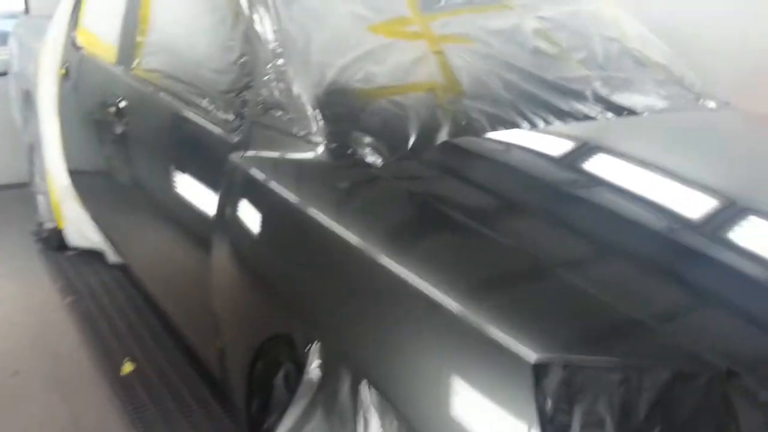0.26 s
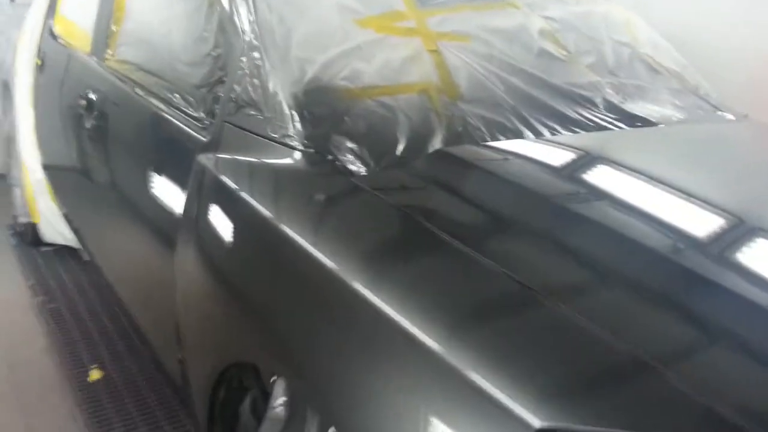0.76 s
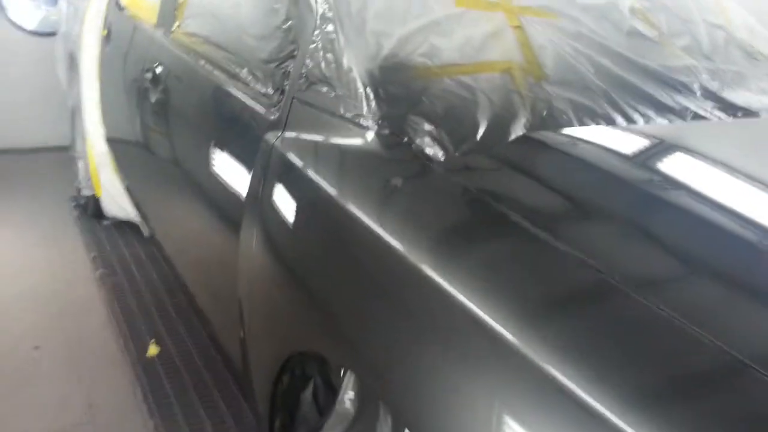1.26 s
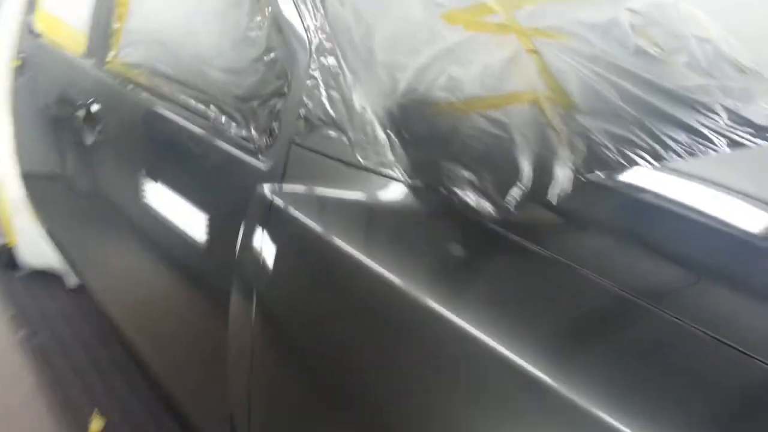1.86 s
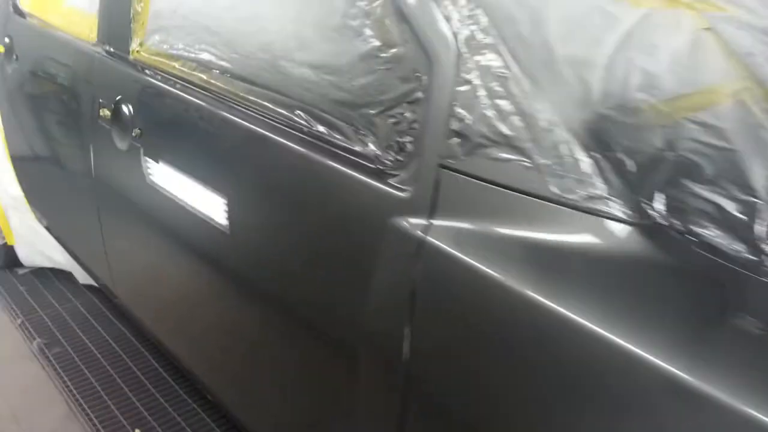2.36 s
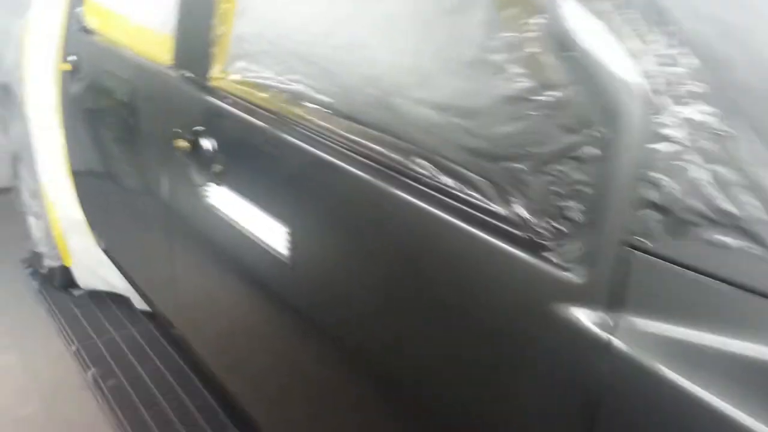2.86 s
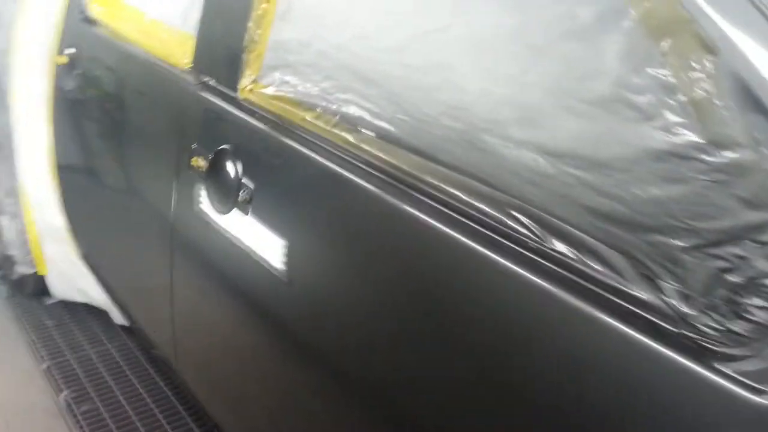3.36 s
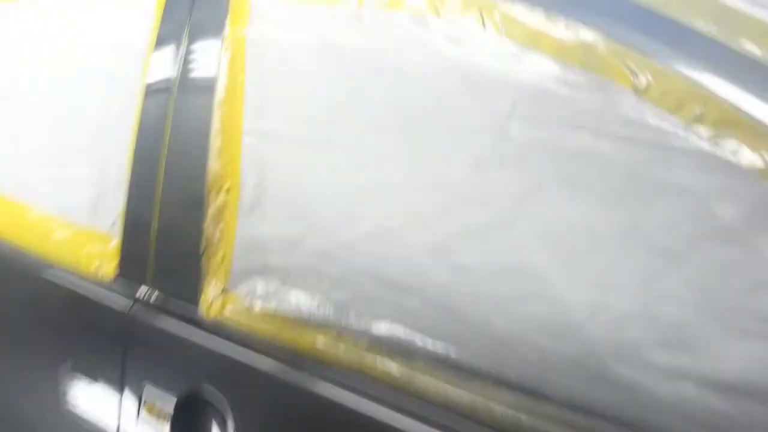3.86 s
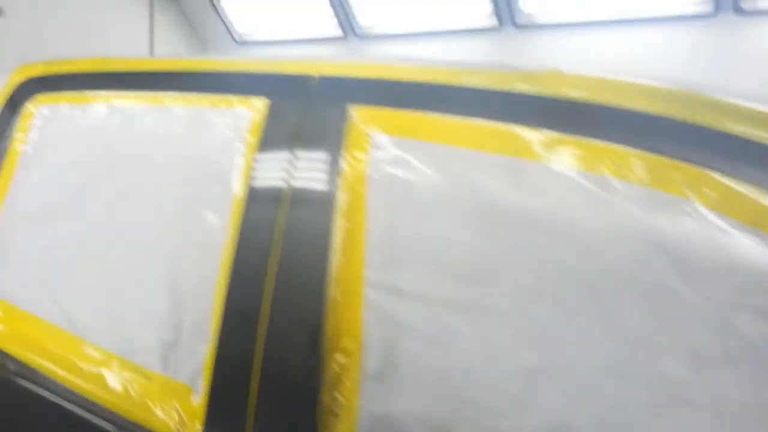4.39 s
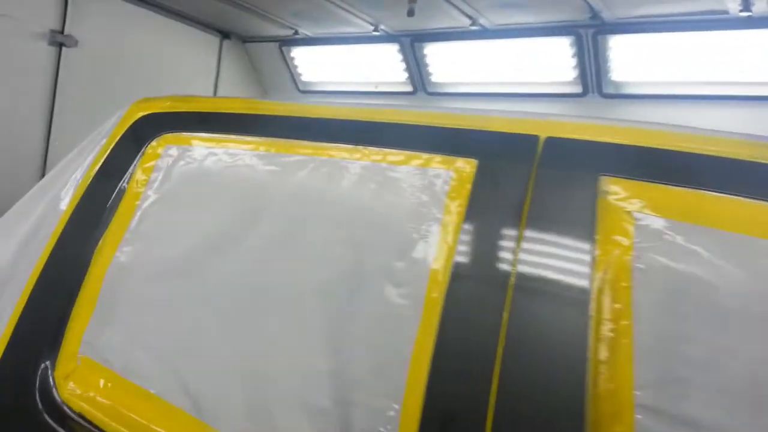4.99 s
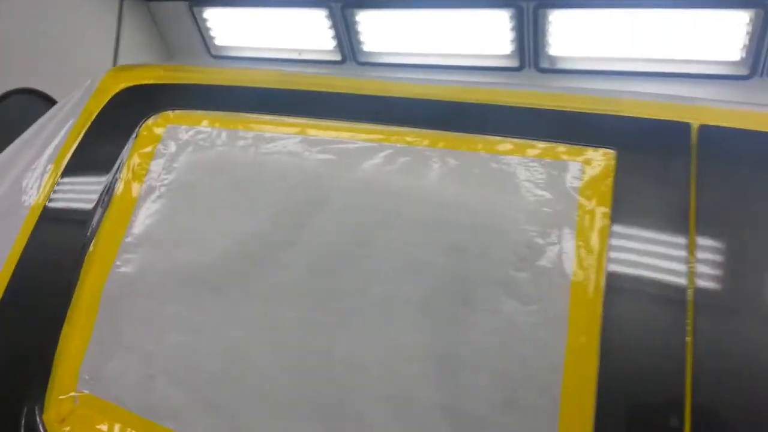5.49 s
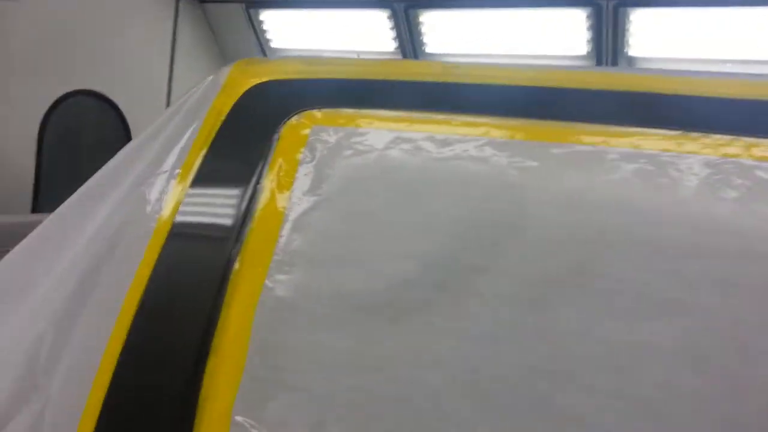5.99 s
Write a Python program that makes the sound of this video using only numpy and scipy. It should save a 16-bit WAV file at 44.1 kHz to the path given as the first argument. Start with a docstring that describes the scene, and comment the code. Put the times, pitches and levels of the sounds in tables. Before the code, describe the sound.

Loud, steady rush of ventilation air fills a hard-walled booth with a wavering low drone; one sharp double tick hits the microphone early on.

```python
"""Ventilation fans run in a large spray booth while a hand-held camera with two microphones moves along a car.
Turbulent air fills the hard-walled booth with a diffuse rush; the ducts drone and the fans hum faintly throughout.
Early on, a sharp double tick on the camera body makes its limiter duck for a moment.
The camera then rises from the car's wing to its roof and the rush grows; a very faint, thin click follows late."""
import sys
import numpy as np
from scipy import signal
from scipy.fft import rfft, irfft
from scipy.io import wavfile
from scipy.ndimage import uniform_filter1d, minimum_filter1d

SR = 44100
rng = np.random.default_rng(int(sys.argv[2]) if len(sys.argv) > 2 else 0)


def transcribe(u):
    """Save the signal u as a 16-bit wav file named by the first command-line argument.

    u: samples, shape (n,) or (channels, n), limited to [-1, 1]; the rate is SR.
    q: integer samples, one column per channel.
    """
    v = np.clip(np.atleast_2d(u).T, -1, 1)
    q = np.round(v * 32767).astype(np.int16)
    wavfile.write(sys.argv[1], SR, q)


N = 275184
TIME = np.arange(N) / SR
FREQ = np.fft.rfftfreq(N, 1 / SR)


def rush(level_db=-16, deep_hz=55, rumble_hz=125, airy_hz=480, hiss_hz=2800, rumble_db=-4.5, airy_db=-1.33):
    """Broad turbulent-air noise, coloured by the microphone ports; rumble and top grow as the camera rises."""
    # relative spectrum of the rush as picked up, closed off steeply above 10 kHz: hz, level_db (per Hz)
    spectrum_table = [(22, -33), (68, -8), (100, -10.5), (132, -2.5), (165, -2.5), (192, -1), (240, -2.5),
                      (300, 0), (338, -2.5), (385, -1.4), (480, -4), (780, -4), (1130, -10.5),
                      (1600, -14.5), (2080, -20), (3000, -33.5), (4200, -39), (7500, -42.5), (9900, -57.5),
                      (12000, -99.5)]
    # cavity behind each microphone port, left then right: centre_hz, width_hz, lift_db
    port_table = [(5650, 1460, 10), (7450, 1360, 10)]
    # camera from low by the car's wing up to its roof: start_s, height (0-1)
    height_table = [(0, 0.07), (1.8, 0.3), (3.6, 0.79), (6.24, 0.8)]
    # rise and fall of the deepest rumble: start_s, gain_db
    deep_table = [(0.0, 0), (2.0, 3.5), (2.64, -10), (3.44, -6), (4.2, -3), (5.2, -1.5), (6.24, -1)]
    # rise and fall of the treble hiss: start_s, gain_db
    hiss_table = [(0, 0.5), (1.7, 0.2), (2.1, 1), (3.2, 0.2), (3.7, 0.9), (4.8, 0.5), (5.6, 1.9),
                  (6.24, 1.5)]
    # gain per unit of height, nearer the ceiling inlet
    rumble_rise_db, airy_rise_db = 6, 1.5

    ports = np.array([1 + (gain_of(db) - 1) * bell(hz, width_hz) for hz, width_hz, db in port_table])
    air = rfft(diffuse(gain_of(over_hz(spectrum_table)) * ports))
    edges_hz = (deep_hz, rumble_hz, airy_hz, hiss_hz)
    below = [1 / (1 + (FREQ / hz) ** 6) for hz in edges_hz]
    shares = np.diff(below, axis=0, prepend=0, append=1)  # five bands that sum to 1
    deep, rumble, body, top, hiss = (irfft(air * share, N) for share in shares)

    height, = over_time(height_table)
    deep_gain_db, = over_time(deep_table)
    hiss_gain_db, = over_time(hiss_table)
    top_gain_db = airy_db + airy_rise_db * height
    deep = deep * gain_of(deep_gain_db)
    rumble = rumble * gain_of(rumble_db + rumble_rise_db * height)
    top = top * gain_of(top_gain_db)
    hiss = hiss * gain_of(top_gain_db + hiss_gain_db)
    return gain_of(level_db) * (deep + rumble + body + top + hiss)


def standing_waves(x, ripple_db=2.5, stay_s=.7, blur_hz=1500):
    """Hard-wall reflections ripple the spectrum, less in the treble; ripple drifts, single bands swell."""
    # brief band swells as the camera moves, widths at half lift: centre_s, length_s, centre_hz, width_hz, lift_db
    swell_table = [(0.085, 0.16, 199, 21, 10.5), (0.423, 0.059, 385, 33, 11), (0.894, 0.25, 382, 30, 7.5),
                   (1.046, 0.26, 744, 91, 5.5), (1.15, 0.56, 540, 60, 5), (1.498, .4, 832, 21, 14),
                   (1.83, 0.35, 970, 90, 3), (1.9, .4, 340, 45, 4.5), (1.976, 0.2, 141, 20, 11),
                   (1.45, .55, 136, 25, 4.5), (2.25, 0.49, 82, 35, 3), (3.7, .55, 92, 60, 4),
                   (4.0, 0.37, 300, 25, 1.5), (6.05, 0.37, 300, 34, 4.5), (2.42, 0.27, 206, 31, 9),
                   (2.462, 0.13, 452, 36, 11), (2.5, .25, 324, 28, 11), (2.5, 0.18, 5500, 1200, 3),
                   (2.95, 0.18, 128, 25, 7), (3.08, 0.32, 730, 73, 6), (3.157, 0.19, 308, 25, 9),
                   (3.5, 0.46, 870, 60, 3), (3.654, 0.21, 996, 76, 7), (3.6, .9, 1580, 220, 1.5),
                   (4.2, 0.41, 123, 15, 6.5), (4.37, 0.15, 306, 21, 10), (4.665, 0.19, 530, 170, 5),
                   (5.05, 0.54, 1200, 240, 5.5), (5.102, 0.1, 403, 26, 10.5), (5.8, 0.19, 133, 27, 10.5),
                   (6.09, 0.41, 1245, 170, 9), (6.204, .25, 388, 22, 8)]
    hz, t, spectrum = signal.stft(x, SR, nperseg=4096, noverlap=3072)
    hz = hz[:, None]
    ripple = rng.standard_normal(spectrum.shape[1:])
    ripple = uniform_filter1d(ripple, max(int(stay_s / t[1]), 2), axis=1)
    ripple = uniform_filter1d(ripple, size=2, axis=0)
    field_db = ripple_db * ripple / ripple.std() / np.hypot(1, hz / blur_hz)
    swell_db = sum(
        lift_db * hump(t, s, length_s) * hump(hz, centre_hz, width_hz)
        for s, length_s, centre_hz, width_hz, lift_db in swell_table)
    rippled = spectrum * gain_of(field_db + swell_db)
    return signal.istft(rippled, SR, nperseg=4096, noverlap=3072)[1][:, :N]


def ducts(hold_s=0.17, surge_s=0.073):
    """Airflow rings the ducts: a strong, wandering resonance surges with gusts and beats with weaker ones."""
    # wander of the strongest resonance: start_s, pitch_hz
    pitch_table = [(0, 245), (1.0, 251), (1.45, 242), (2.4, 236), (2.95, 247), (3.4, 236), (4.2, 247),
                   (6.24, 245)]
    # weaker resonances: centre_hz, width_hz, level_db
    weak_table = [(210.7, 3.3, -6.5), (229.4, 8, -7.5), (272.8, 6.6, -6), (309, 10, -10)]
    # drone level through the booth's standing waves: start_s, level_db
    level_table = [(0.0, -33), (0.6, -27), (1.0, -20.5), (1.55, -20.5), (1.95, -24), (2.4, -22.5),
                   (2.65, -28), (3.0, -19.5), (3.35, -22), (3.85, -25.5), (4.25, -24), (4.75, -31.5),
                   (4.95, -23.5), (5.25, -38.5), (5.8, -22), (6.24, -31)]
    # gusts on the strongest resonance: centre_s, lift_db
    surge_table = [(0.12, 7), (0.45, 10.5), (1.28, 6), (1.43, 5.5), (1.59, 6), (2.22, 3), (2.38, 2),
                   (2.96, 9), (3.14, -2), (3.28, 7.5), (4.0, 3), (4.17, 8.5), (4.31, 9.5), (5.47, 13),
                   (5.73, 11), (5.83, 4.5)]

    pitch_hz, = over_time(pitch_table)
    strong = gliding(pitch_hz, width_hz=9.5, span_s=.08)
    weak = sum(gain_of(db) * steadied(diffuse(bell(hz, width_hz)), hold_s) for hz, width_hz, db in weak_table)
    surge_db = sum(lift_db * hump(TIME, s, surge_s) for s, lift_db in surge_table)
    level_db, = over_time(level_table)
    unsurged_rms = (strong + weak).std()
    return gain_of(level_db) * (gain_of(surge_db) * strong + weak) / unsurged_rms


def clicks(rise_s=.00006, lowest_hz=4500, highest_hz=14300):
    """Treble rings of a few milliseconds: the double tick is a knock on so small a case and its ports that it
    radiates no bass; a very faint, thin click rings the same way."""
    # double tick on the camera body, then a very faint click; weaker ones thinner:
    # start_s, left_db, right_db, tilt_db_per_octave
    click_table = [(.1928, -13, -17, 5), (.1977, -4.5, 8, 0), (5.183, -38, -43, 13)]
    # rings in each click: pitch_hz, t60_s, lag_s, left_db, right_db
    ring_table = [(5400, .0038, .0006, 3, -28), (6070, .0036, .0006, -1, -28), (7520, .0026, 0, -15, 1),
                  (9500, .0024, 0, 0, -4.5), (11300, .0015, 0, -9, -7.5), (14200, .0013, 0, -13, -18)]
    out = np.zeros((2, N))
    t = np.arange(SR // 100) / SR
    band = signal.butter(4, [lowest_hz, highest_hz], "band", fs=SR, output="sos")
    for start_s, left_db, right_db, tilt_db in click_table:
        start = round(start_s * SR)
        for hz, t60_s, lag_s, ring_left_db, ring_right_db in ring_table:
            age_s = np.maximum(t - lag_s, 0)
            envelope = (1 - np.exp(-age_s / rise_s)) * np.exp(-np.log(1000) * age_s / t60_s)
            ring = envelope * np.sin(2 * np.pi * hz * age_s)
            level_db = np.array([[left_db + ring_left_db], [right_db + ring_right_db]])
            level_db = level_db + tilt_db * np.log2(hz / ring_table[0][0])
            out[:, start:start + len(t)] += gain_of(level_db) * signal.sosfilt(band, ring)
    return out


def fans(hum_hz=160.2, hum_db=-3.5, whine_db=4.0):
    """Blade tones, a hum and a thin whine, blurred by the turbulence that the blades cut through."""
    # hum, before the hum_db offset: start_s, level_db
    hum_table = [(0.0, -24.5), (0.56, -21), (1.76, -30), (2.08, -41), (2.4, -22), (3.76, -23.5),
                 (4.56, -29), (4.96, -18.5), (6.24, -35)]
    # whine, before the whine_db offset: start_s, level_db, pitch_hz
    whine_table = [(0.0, -55, 632), (0.48, -26.5, 633.3), (0.8, -37, 637), (3.8, -36, 670), (4.2, -30, 672),
                   (4.5, -27, 661.4), (4.75, -30, 630.3), (5.0, -27.5, 632.5), (5.3, -29.5, 628.8),
                   (5.65, -24.5, 627.7), (5.95, -31, 634.2), (6.24, -29, 633)]
    hum = steadied(diffuse(bell(hum_hz, width_hz=13.6)), span_s=0.25)
    hum_level_db, = over_time(hum_table)
    whine_level_db, pitch_hz = over_time(whine_table)
    whine = gliding(pitch_hz, width_hz=26.6, span_s=.35)
    return gain_of(hum_db + hum_level_db) * hum + gain_of(whine_db + whine_level_db) * whine


def diffuse(shape):
    """Noise of rms 1 at the two microphones: alike in the bass, unrelated in the treble."""
    # left over right: hz, balance_db
    balance_table = [(60, -3.5), (200, 0), (420, 2), (520, 1), (820, 2.5), (1150, 4.5), (1850, 6),
                     (2300, 5), (3100, -0.5), (4500, -1), (7000, -3.5), (8500, -8.5), (10000, -14)]
    # phase lead of the left port: hz, lead_rad
    lead_table = [(60, 0.15), (340, 0.24), (500, 0.087), (780, 0.87), (1000, 0.2), (1400, 0.022)]
    a, b, c, d = rng.standard_normal((4, len(FREQ)))
    same, right = arrival(), a + 1j * b
    unrelated = np.sqrt(np.maximum(1 - np.abs(same) ** 2, 0)) * (c + 1j * d)
    left = same * right + unrelated
    pair = np.array([left * np.exp(1j * over_hz(lead_table)), right])
    balance = gain_of(np.outer([.5, -.5], over_hz(balance_table)))
    x = irfft(pair * shape * balance, N)
    return x / np.sqrt(np.mean(x ** 2))


def arrival(spacing_m=0.17, lean=0.83):
    """Complex coherence of two microphones in air noise from all sides, but more from the right."""
    turn = 2 * np.pi * FREQ * spacing_m / 343 + 1e-4  # 343 m/s; offset avoids 0/0
    even = np.sin(turn) / turn
    return even - 1j * lean * (even - np.cos(turn)) / turn


def gliding(pitch_hz, width_hz, span_s):
    """A narrow, even band of noise whose centre follows a pitch curve by frequency shift."""
    centre_hz = pitch_hz.mean()
    band = steadied(diffuse(bell(centre_hz, width_hz)), span_s)
    shift = np.exp(2j * np.pi * np.cumsum(pitch_hz - centre_hz) / SR)
    return (signal.hilbert(band) * shift).real


def steadied(x, span_s):
    """Evens out the slow swells of a narrow noise and keeps its quick beating."""
    power = uniform_filter1d(np.mean(x ** 2, axis=0), max(int(span_s * SR), 2))
    return x / np.sqrt(np.abs(power) + 1e-9)


def bell(hz, width_hz):
    """Magnitude of a resonance, 1 at its centre, about 3 dB down at the edges of its width."""
    return 1 / (1 + ((FREQ - hz) / (.78 * width_hz)) ** 2)


def hump(x, centre, width):
    """A smooth rise to 1 at the centre, half as high at the edges of its width."""
    return .5 ** ((2 * (x - centre) / width) ** 2)


def gain_of(db):
    """Decibels to amplitude."""
    return 10 ** (np.asarray(db) / 20)


def over_hz(points):
    """A table joined by straight lines on a log-frequency axis."""
    hz, value = np.transpose(points)
    return np.interp(np.log(FREQ + 1), np.log(hz), value)


def over_time(rows):
    """Each column of a curve table, sample by sample."""
    s, *columns = np.transpose(rows)
    return [np.interp(TIME, s, column) for column in columns]


def scene():
    """Air, ducts and fans all round; the clicks right at the microphones."""
    return standing_waves(rush()) + ducts() + fans() + clicks()


def record(dry, duck_db=15, hold_s=.0185, ramp_s=.004, ceiling=.99, stop_s=.003, edge_hz=15800):
    """An overload trips the limiter, which ducks, holds and lets go; then clipping, a soft stop, the band limit."""
    overload = np.clip((np.abs(dry).max(axis=0) - 1.1) * 10, 0, 1)
    hold, ramp = int(hold_s * SR), int(ramp_s * SR)
    held = -minimum_filter1d(-overload, hold, origin=(hold - 1) // 2)  # running maximum of the past
    duck = signal.lfilter(np.ones(ramp) / ramp, [1], held)
    clipped = np.clip(dry * gain_of(-duck_db * duck), -ceiling, ceiling)
    stop = np.minimum((TIME[-1] - TIME) / stop_s, 1)
    lowpass = signal.firwin(127, edge_hz, window=("kaiser", 9), fs=SR)
    return signal.oaconvolve(clipped * stop, lowpass[None], "same")


dry = scene()
out = record(dry)
transcribe(out)
```